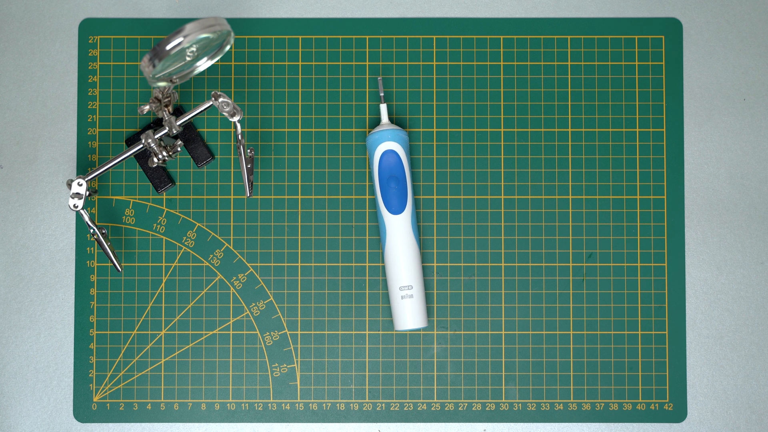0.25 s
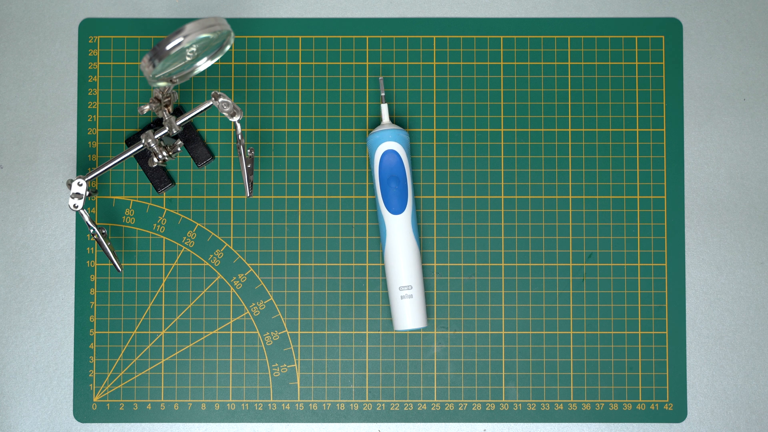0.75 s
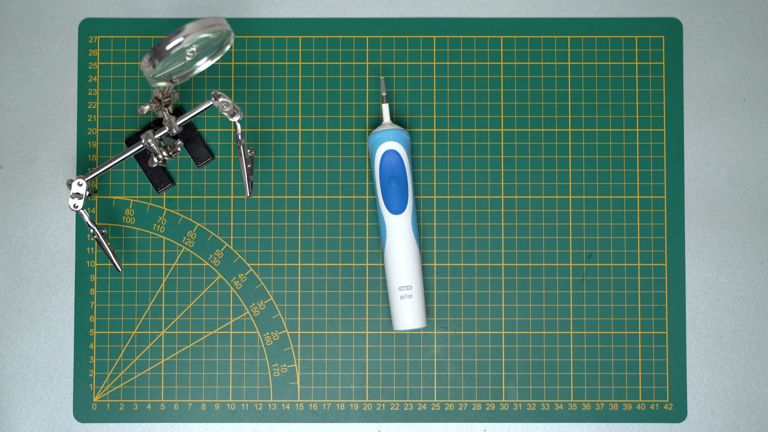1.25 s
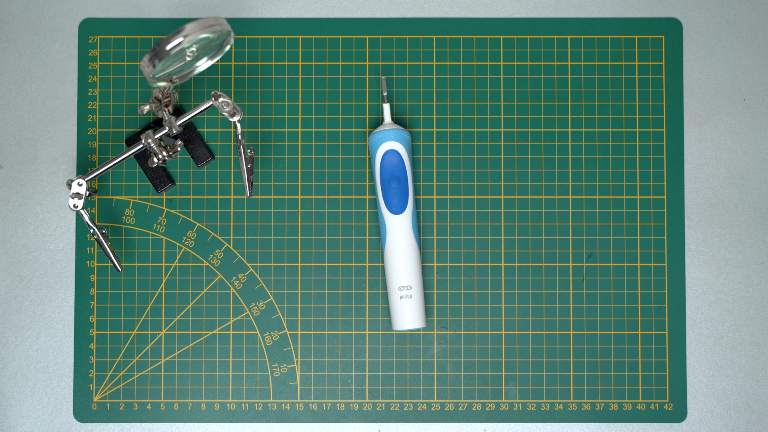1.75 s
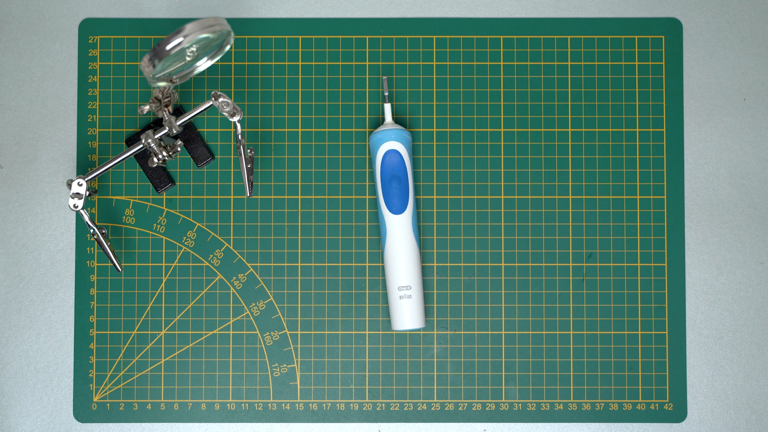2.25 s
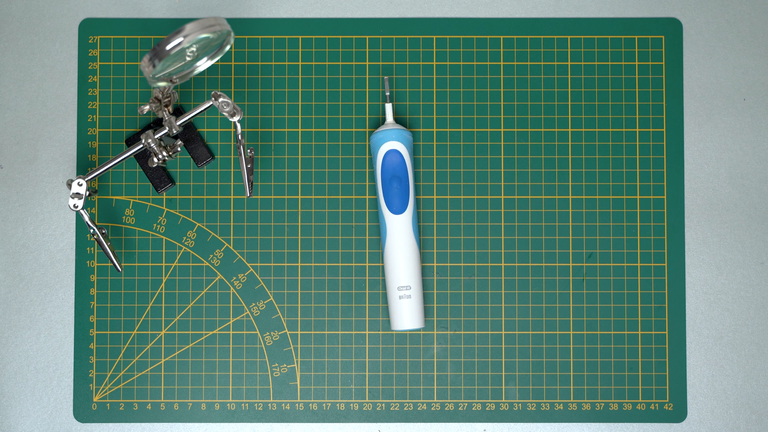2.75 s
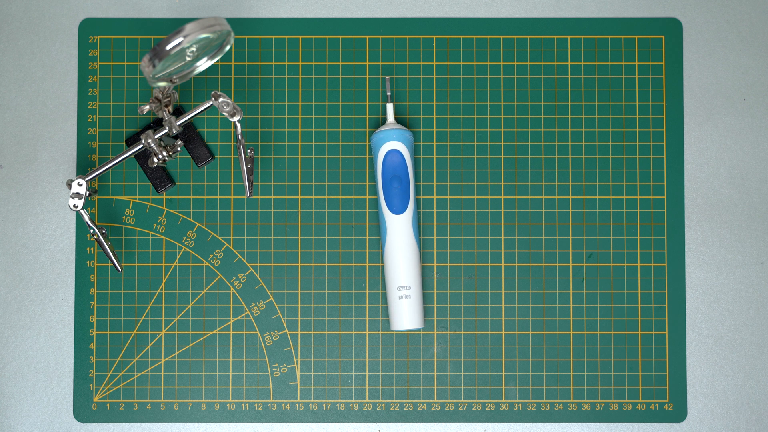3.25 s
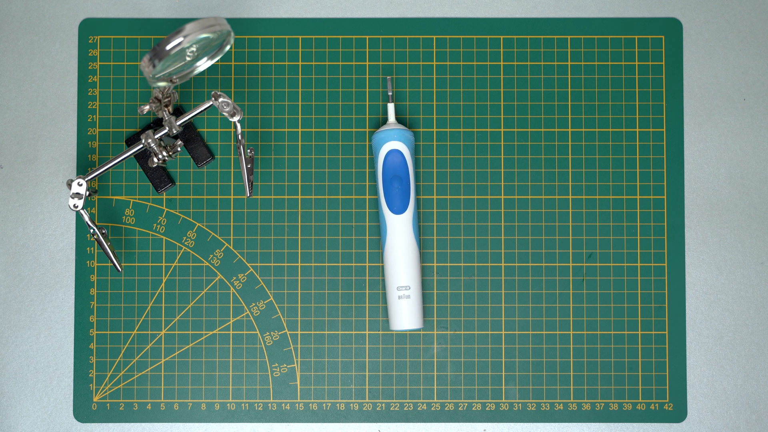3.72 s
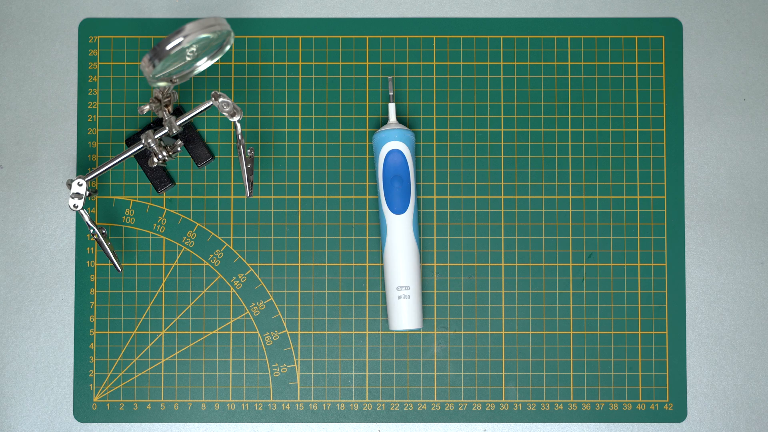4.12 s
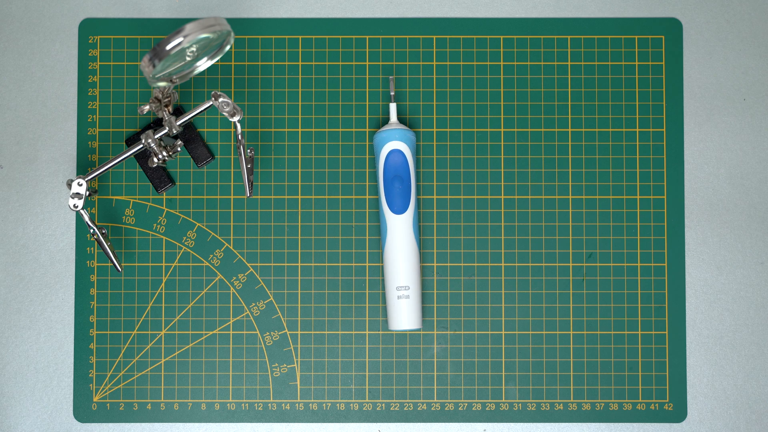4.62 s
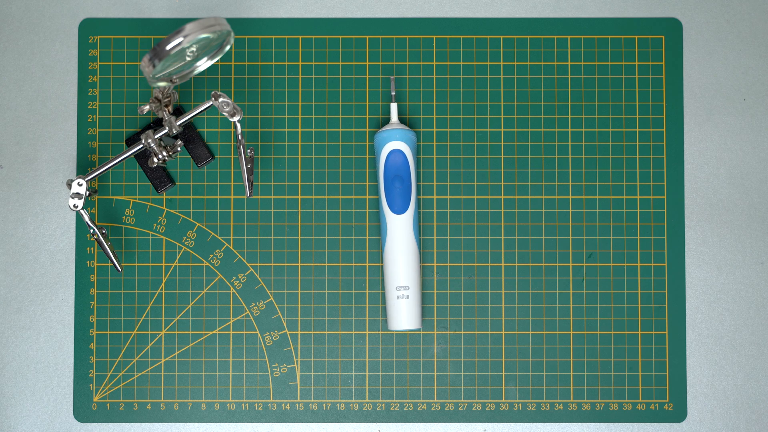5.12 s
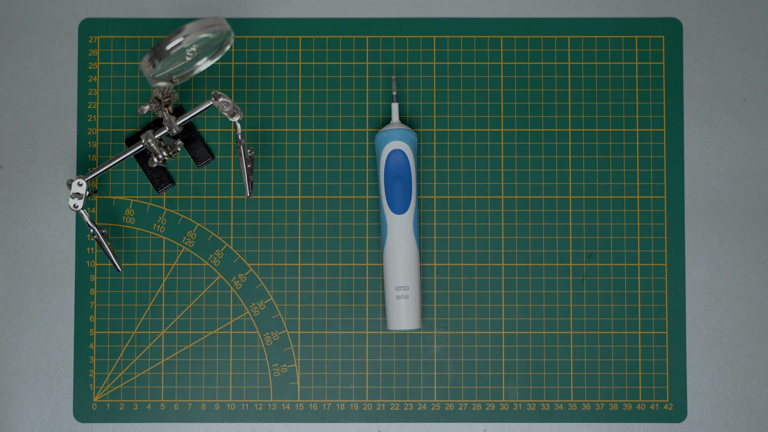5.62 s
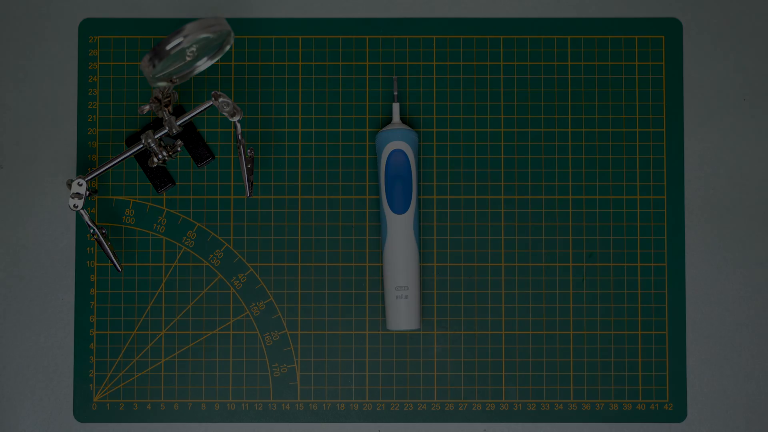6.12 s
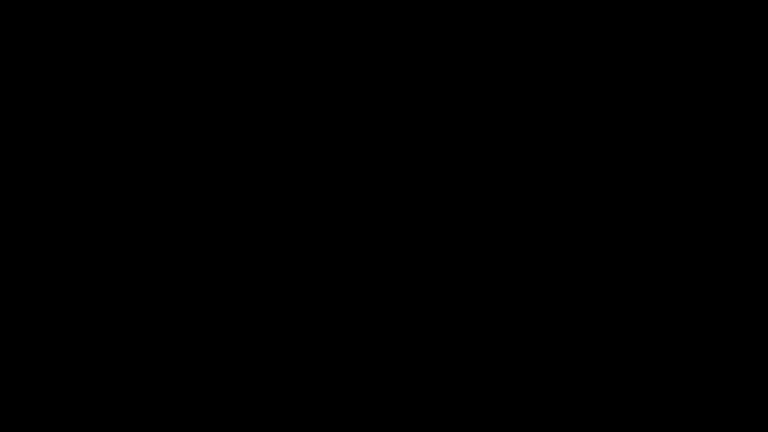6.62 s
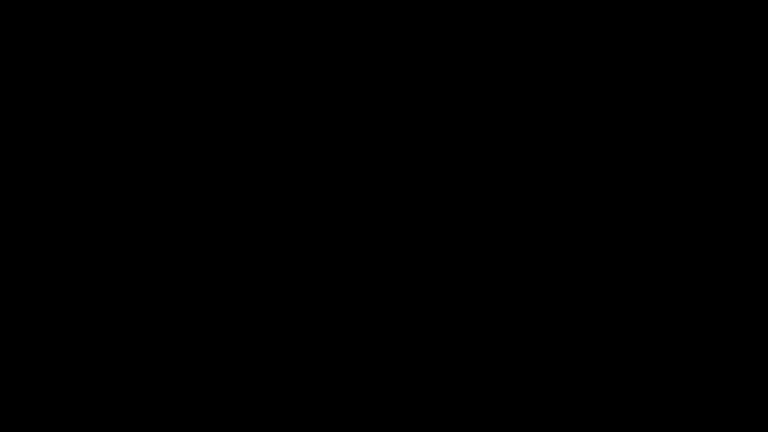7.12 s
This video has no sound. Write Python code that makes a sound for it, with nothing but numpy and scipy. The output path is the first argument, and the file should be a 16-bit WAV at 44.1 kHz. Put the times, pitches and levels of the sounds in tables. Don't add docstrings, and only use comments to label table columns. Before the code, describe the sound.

Continuous buzzing from a battery toothbrush, heard close and dry indoors. Rapid gear rattle fuses into a harsh, plastic-sounding drone with several high whining tones and a fine, fast flutter. The vibrating body softly bumps and rubs against the mat beneath, almost hidden by the motor. Near the end the whine thins a little and returns; there is no start or stop.

```python
import sys
import numpy as np
from scipy import signal
from scipy.fft import rfft, irfft
from scipy.io import wavfile

SR = 44100
rng = np.random.default_rng(int(sys.argv[2]) if len(sys.argv) > 2 else 0)


def master_out(mix):
    frames = np.transpose(np.atleast_2d(mix))
    ceiling = np.clip(frames, -1, 1)
    pcm = np.round(ceiling * 32767).astype(np.int16)
    wavfile.write(sys.argv[1], SR, pcm)


def to_linear_factor(level_db):
    exponent = np.asarray(level_db, float) / 20
    return 10 ** exponent


N = 324999
CROWN_TEETH = 26
PATTERN_TURNS = 5
PINION_TURNS = 2.6

# start_s, turns_per_s
CRANK_SPEED = [(0.0, 74.88), (0.4, 74.83), (1.0, 74.85), (1.2, 74.8), (1.45, 74.91), (2.02, 74.885),
               (2.25, 75.0), (2.76, 74.83), (3.3, 74.93), (3.55, 74.82), (3.98, 74.96), (4.56, 74.845),
               (4.76, 74.935), (5.56, 74.915), (5.72, 74.85), (5.95, 75.02), (6.85, 74.95), (7.37, 74.9)]
# crank_angle_turns, centre_hz, level_db, looseness_0_to_1, pinion_angle_turns
KNOCKS = [(0.32, 3500, -6, 0.3, 0.7), (0.117, 11400, 2.5, 0.35, 0.55), (0.132, 4800, -6, 0.2, 0.25),
          (0.137, 8400, -1, 0.15, 0.08), (0.16, 6900, -3, 0.2, 0.25), (0.22, 7900, -6, 0.3, 0.65),
          (0.222, 2100, -7, 0.1, 0.05), (0.29, 2600, -8, 0.1, 0.2), (0.37, 2700, -6, 0.1, 0.05),
          (0.427, 5700, -7, 0.2, 0.35), (0.43, 9600, -5, 0.3, 0.35), (0.44, 3700, -6, 0.1, 0.5),
          (0.5, 2400, -5, 0.05, 0.15), (0.5, 6000, -9, 0.25, 0.8), (0.525, 4200, -6, 0.1, 0.6),
          (0.567, 3800, -5, 0.6, 0.1), (0.647, 9300, -1.5, 0.4, 0.75), (0.65, 12200, -2, 0.7, 0.35),
          (0.66, 6700, -7, 0.35, 0.05), (0.71, 3100, -6, 0.3, 0.45), (0.78, 3700, -6, 0.5, 0.7),
          (0.88, 2400, -9, 0.1, 0.5), (0.96, 5600, -8, 0.2, 0.8)]
# start_s, level_db
RATTLE_LEVEL = [
    (0.0, -39),
    (0.02, -38),
    (1.41, -38),
    (5.21, -38),
    (6.46, -38),
    (7.31, -38),
    (7.37, -38.5),
]
# pitch_hz, level_db (per Hz)
HANDLE_RESPONSE = [(1400, -26), (1540, -9), (2100, -5), (2850, -12.5), (3080, 3.5), (3450, 4), (4300, -1),
                   (5200, -3.5), (5900, -2), (8300, -0.5), (9700, -4), (10200, -14.5), (12050, -8),
                   (12350, -18), (15600, -40)]
# pitch_hz, width_hz, depth_db
HANDLE_HOLLOWS = [(1950, 160, -1.5), (2960, 60, -11), (4090, 72, -8), (4303, 180, -0.5), (5600, 140, 4.5),
                  (7300, 110, 2), (8250, 300, 1.5), (8580, 43, -5), (12400, 250, -7)]
# start_s, level_db
SEATING = [
    (0, 0),
    (2.2, -0.8),
    (3.8, 0.8),
    (5.6, 0),
    (6.08, -4),
    (6.7, -2),
    (6.95, -4),
    (7.12, 0),
    (7.37, -2),
]
SEATING_SHARES = [1.5, 1.0, 0.55]
# crank_multiple, level_db (rms)
SHAFT_WHINE = [(42, -59), (44, -62), (45, -63), (46, -63), (47, -60), (48, -63), (50, -63), (51, -57),
               (53, -64), (55, -59.5), (56, -53), (60, -63), (66, -67), (76, -67), (77, -63), (78, -64),
               (79, -55.5), (80, -61), (85, -59), (91, -60), (93, -59), (96, -61), (100, -64), (101, -62),
               (106, -60), (107, -59), (109, -59), (110, -62), (111, -60), (113, -56.5)]
# crank_multiple, level_db (rms)
FURTHER_WHINE = [(21, -72), (22.2, -71), (23.6, -71), (24, -68), (25, -67), (26, -71), (27, -70), (28, -66),
                 (29, -67), (30.2, -73), (31.6, -74), (32.4, -72), (35.6, -73), (37.6, -74), (41, -63),
                 (58, -66), (59, -66), (68, -67), (73, -65), (74, -66), (75, -65), (88, -64), (89, -64),
                 (95, -66), (105, -68), (119, -63)]
# crank_multiple, level_db (rms)
CRANK_HUM = [(1, -86), (2, -82), (4, -76), (5, -82), (6, -91), (7, -88), (8, -86), (10, -90), (11, -77),
             (12, -86), (13, -85), (15, -87), (17, -89), (18, -85)]
# motor_multiple, added_crank_multiple, level_db (rms)
MOTOR_HUM = [(1, -1, -87), (1, 0, -81), (1, 1, -87), (1, 2, -81), (1, 5, -84), (1, 7, -89), (1, 9, -88),
             (2, -3, -89), (2, -1, -88), (2, 0, -85), (2, 6, -89), (2, 7, -87), (3, -3, -88), (3, -1, -90),
             (3, 0, -74), (3, 1, -89), (3, 2, -84), (3, 3, -80), (3, 4, -84), (3, 5, -88), (3, 6, -88),
             (4, -6, -88), (4, -3, -91), (6, 0, -82), (7, 0, -88)]
ORDER_GROUPS = [(3.5, 1.85, .4), (6.7, 2.6, .18), (9, 3.4, .12), (13.7, .7, .15), (20, 4.2, .6),
                (40, 2.5, .8), (54, .48, .35), (57, .55, .1), (75.5, .5, .5), (81, .49, .15),
                (101, .68, .5), (120, .21, .25)]
GROUP_RADIATION = [-0.6, 0, -0.1, -1, -0.2, -2, -3, 1.6, 1, 4, 1, 4]
# start_s, level_db
THUDS = [(0.28, -72), (0.55, -75), (0.65, -74), (0.8, -74), (0.94, -67), (1.41, -68), (1.8, -80),
         (2.07, -70), (2.33, -77), (2.6, -77), (3.28, -72), (3.45, -77), (3.74, -75), (3.85, -69),
         (4.41, -74), (5.16, -69), (5.42, -83), (5.58, -77), (5.68, -76), (5.88, -75), (6.02, -66),
         (6.63, -77), (6.81, -79), (6.98, -78)]
HOPS = [(0.59, -80), (0.72, -83), (0.86, -80), (1.18, -81), (1.3, -79), (1.64, -78), (2.07, -82),
        (3.45, -78), (3.8, -87), (4.21, -76.5), (4.8, -75), (5.07, -78), (5.4, -75.5), (5.89, -79),
        (6.46, -79), (6.9, -80), (7.25, -84)]
SCUFFS = [(0.31, -78), (1.23, -80), (1.54, -76), (2.12, -76.5), (2.3, -78), (2.4, -80), (3.46, -83),
          (3.84, -83), (4.8, -81), (5.15, -84), (5.65, -82), (6.27, -83), (6.63, -82), (7.08, -83),
          (7.27, -78)]
# pitch_hz, level_db (per Hz)
THUD_SPECTRUM = [(30, -31), (70, -9), (125, -3.5), (190, -9), (260, -28.5)]
HOP_SPECTRUM = [(240, -21), (330, -5.5), (420, -7), (480, -14), (560, -28)]
SCUFF_SPECTRUM = [(450, -17.5), (585, -4), (690, -5.5), (850, -1), (1080, -7), (1450, -11.5), (1700, -60)]
RUB_DB = [-86, -91, -84.5]
BUMP_S = [0.025, 0.04, 0.029]
PUMP_DB = [0, 6, -6]
# pitch_hz, level_db (per Hz)
ROOM_SPECTRUM = [(12, 2), (30, 10), (60, -14), (250, 4.5), (1400, -37), (3000, -38)]


def gear_rattle(crank):
    mesh_db, mesh_looseness = -12.0, 0.39
    crown_share, memory = 0.26, 0.26
    mesh_phase = 0.2
    pairs = CROWN_TEETH * PATTERN_TURNS
    mesh = np.arange(int(crank[-1] * CROWN_TEETH) - 1)
    at = np.interp((mesh + mesh_phase) / CROWN_TEETH, crank, np.arange(N))
    turn, centre_hz, db, looseness = linkage_knocks()
    pair = np.round(turn * CROWN_TEETH - mesh_phase).astype(int)
    seated = seating_gains()[2][at.astype(int)]
    stroke = np.cos(2 * np.pi * (np.arange(pairs) / CROWN_TEETH - 0.52))
    bearing = to_linear_factor(mesh_db + 2.0 * stroke) ** 2
    out = np.zeros(N)
    for hz in np.geomspace(1550, 15000, 34):
        knock = to_linear_factor(db) ** 2 * np.exp(-((centre_hz - hz) / (0.15 * hz + 250)) ** 2)
        dulling = min(1, 8500 / hz)
        power = bearing * dulling ** 1.2 + np.bincount(pair, knock, pairs)
        loose_power = mesh_looseness * bearing * dulling ** 4.1 + np.bincount(pair, knock * looseness, pairs)
        slack = np.clip(loose_power / power, 0, 1)
        crown = np.tile(np.exp(2j * np.pi * rng.random(CROWN_TEETH)), PATTERN_TURNS)
        meeting = np.exp(2j * np.pi * rng.random(pairs))
        regular = np.sqrt(crown_share) * crown + np.sqrt(1 - crown_share) * meeting
        stray = chance(len(mesh) // pairs + 1, pairs)
        stray = signal.lfilter([np.sqrt(1 - memory ** 2)], [1, -memory], stray, axis=0)
        hits = np.sqrt(power) * (np.sqrt(1 - slack) * regular + np.sqrt(slack) * stray)
        hits = hits.ravel()[:len(mesh)]
        if 4700 < hz < 6200:
            hits = hits * seated
        mode = ring(at, hits, hz, 0.007 * (4000 / hz) ** 1.26)
        out += mode * np.sqrt(hz / 4000) * drift(5, lambda knots: to_linear_factor(0.88 * knots))
    return rms_one(coloured(out, HANDLE_RESPONSE, HANDLE_HOLLOWS))


def linkage_knocks():
    swing_db = 1
    angle, centre_hz, db, looseness, hardest = np.transpose(KNOCKS * PATTERN_TURNS)
    turn = np.repeat(np.arange(PATTERN_TURNS), len(KNOCKS))
    db = db + swing_db * (np.cos(2 * np.pi * (PINION_TURNS * turn - hardest)) - 1)
    return turn + angle, centre_hz, db, looseness


def ring(at, strengths, hz, t60):
    pole = to_linear_factor(-60 / (t60 * SR)) * np.exp(2j * np.pi * hz / SR)
    clicks = np.full(N + 2, 1e-18, complex)
    whole = np.ceil(at).astype(int)
    np.add.at(clicks, whole, strengths * pole ** (whole - at))
    return signal.lfilter([1], [1, -pole], clicks[:N]).imag * np.sqrt(1 - abs(pole) ** 2)


def whine_and_hum(crank):
    size = 2 ** 17
    motor = [(PINION_TURNS * multiple + beat, db) for multiple, beat, db in MOTOR_HUM]
    multiple, db = np.transpose(sorted(CRANK_HUM + motor) + FURTHER_WHINE + SHAFT_WHINE)
    top, peak, scatter = np.transpose(ORDER_GROUPS)
    group = np.searchsorted(top, multiple)
    start = scatter[group] * rng.uniform(-0.51, 0.55, len(db)) - multiple * peak[group]
    place = (crank * (size / PATTERN_TURNS)).astype(int) % size
    low_whine, high_whine, _ = seating_gains()
    seated = {7: low_whine, 9: high_whine}
    out = 0
    for g, radiated_db in enumerate(GROUP_RADIATION):
        for half in (0, 1):
            pick = (group == g) & (np.arange(len(db)) % 2 == half)
            lines = np.zeros(size // 2 + 1, complex)
            order = np.round(multiple[pick] * PATTERN_TURNS).astype(int)
            lines[order] = to_linear_factor(db[pick]) * np.exp(2j * np.pi * start[pick])
            sway = drift(8, lambda knots: to_linear_factor(radiated_db + 0.9 * knots))
            out = out + seated.get(g, 1) * sway * irfft(lines)[place] * size / np.sqrt(2)
    return out


def crank_angle():
    return np.cumsum(in_time(CRANK_SPEED)[0]) / SR + 0.0008 * drift(12)


def seating_gains():
    return to_linear_factor(np.outer(SEATING_SHARES, in_time(SEATING)[0]))


def mat_rocking(crank):
    pump = np.cos(2 * np.pi * (crank - 2.9) / PATTERN_TURNS)
    bumps = (THUDS, HOPS, SCUFFS)
    spectra = (THUD_SPECTRUM, HOP_SPECTRUM, SCUFF_SPECTRUM)
    lifts_db = (3.5, 7.5, 6.0)
    out = 0
    for i in range(3):
        gain = rubbing(bumps[i], RUB_DB[i], BUMP_S[i]) * to_linear_factor(lifts_db[i] + PUMP_DB[i] * pump)
        out = out + gain * noise(spectra[i])
    return out


def rubbing(bumps, rub_db, half_s):
    lumps_per_s, lump_db = 17, 4.5
    t = np.arange(0, N, 64) / SR
    swells = sum(to_linear_factor(db) ** 2 * np.exp(-((t - s) / half_s) ** 2) for s, db in bumps)
    rub = drift(lumps_per_s, lambda knots: to_linear_factor(rub_db + lump_db * knots))
    return np.sqrt(rub ** 2 + np.interp(np.arange(N) / SR, t, swells))


def quiet_room():
    return drift(4.2, lambda knots: to_linear_factor(-81 + 2.6 * knots)) * noise(ROOM_SPECTRUM)


def noise(points):
    return rms_one(coloured(rng.standard_normal(N), points))


def coloured(x, points, hollows=()):
    hz = np.fft.rfftfreq(N + 1, 1 / SR) + 1
    point_hz, point_db = np.transpose(points)
    db = np.interp(np.log(hz), np.log(point_hz), point_db)
    for at_hz, width_hz, depth_db in hollows:
        db = db + depth_db * np.exp(-((hz - at_hz) / width_hz) ** 2)
    return irfft(rfft(x, N + 1) * to_linear_factor(db))[:N]


def drift(rate, shape=lambda knots: knots):
    knots = shape(rng.standard_normal(int(rate * N / SR) + 2))
    return np.interp(np.arange(N) * (rate / SR), np.arange(len(knots)), knots)


def chance(*shape):
    return (rng.standard_normal(shape) + 1j * rng.standard_normal(shape)) / np.sqrt(2)


def in_time(rows):
    s, *columns = np.transpose(rows)
    return np.array([np.interp(np.arange(N) / SR, s, c) for c in columns])


def rms_one(x):
    return x / np.sqrt(np.mean(x ** 2))


def scene():
    crank = crank_angle()
    level = to_linear_factor(in_time(RATTLE_LEVEL)[0])
    rattle = level * to_linear_factor(-2.0) * gear_rattle(crank)
    brush = rattle + level / level.mean() * whine_and_hum(crank)
    return (brush + mat_rocking(crank) + quiet_room())[None]


def roll_off(x):
    return signal.sosfilt(signal.butter(12, 15690, fs=SR, output="sos"), x)


def record(dry):
    return roll_off(dry)


dry = scene()
out = record(dry)
master_out(out)
```